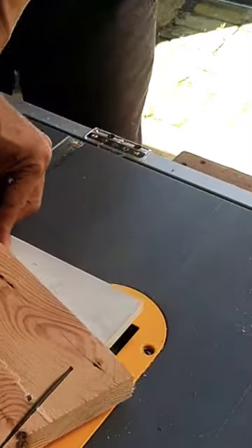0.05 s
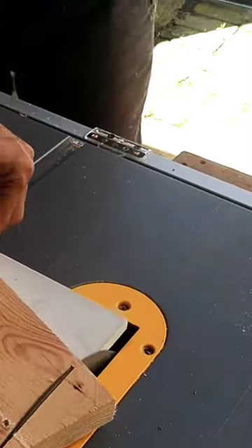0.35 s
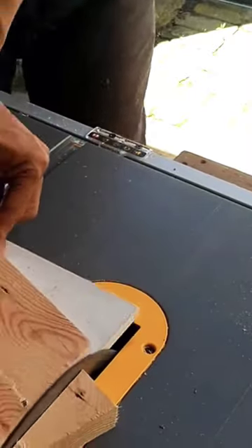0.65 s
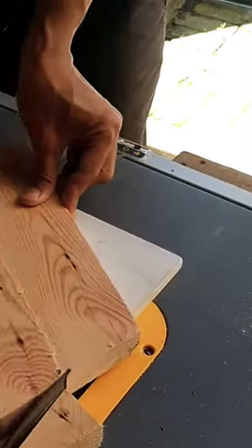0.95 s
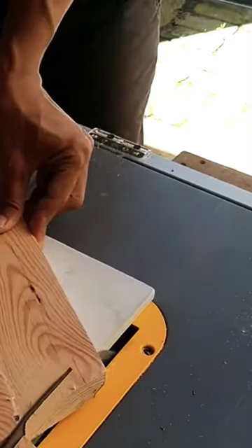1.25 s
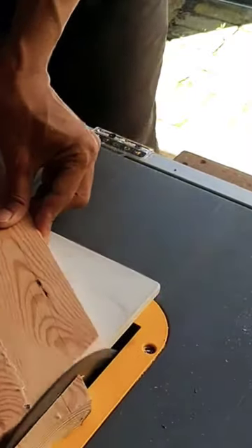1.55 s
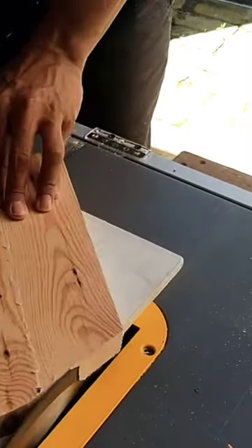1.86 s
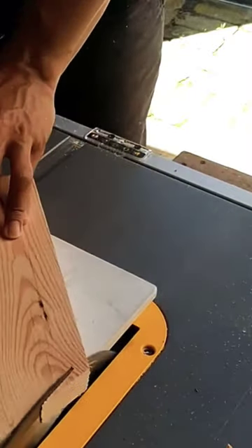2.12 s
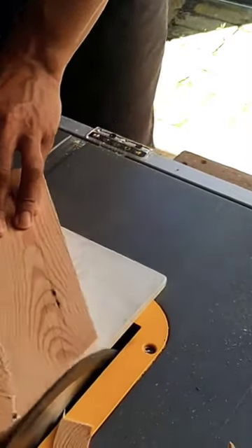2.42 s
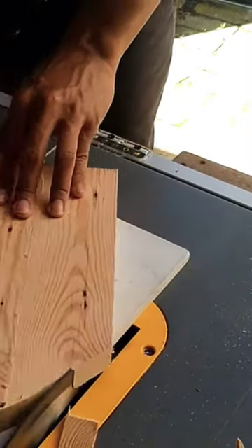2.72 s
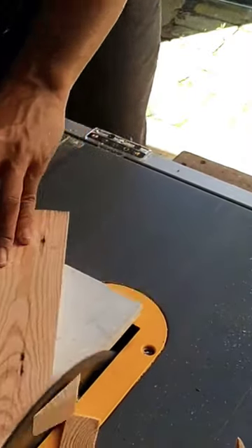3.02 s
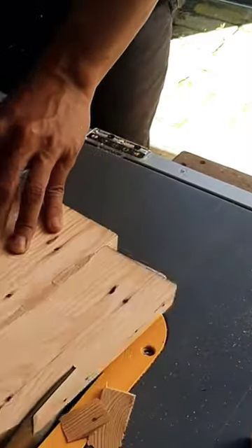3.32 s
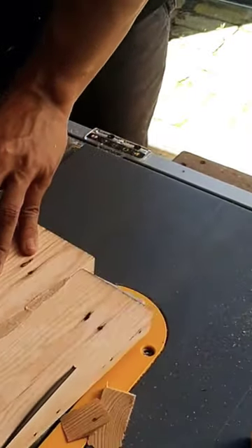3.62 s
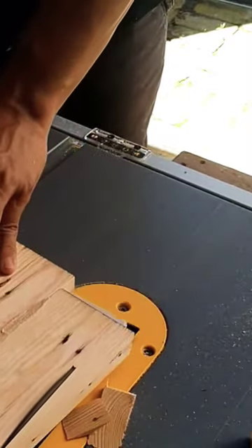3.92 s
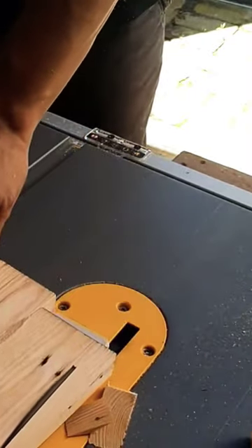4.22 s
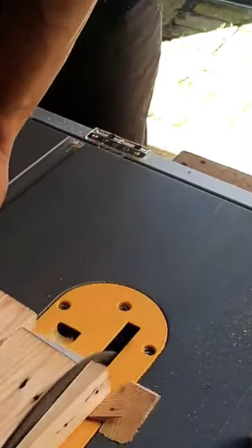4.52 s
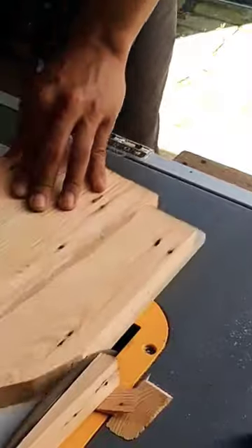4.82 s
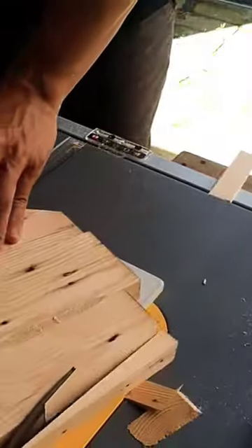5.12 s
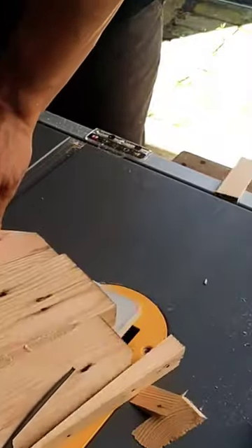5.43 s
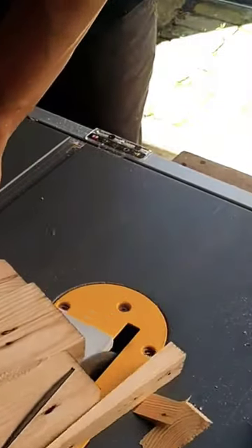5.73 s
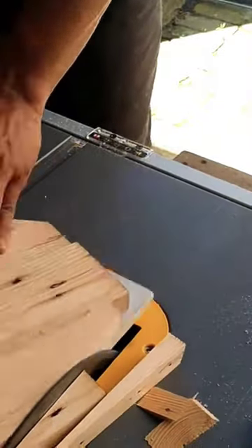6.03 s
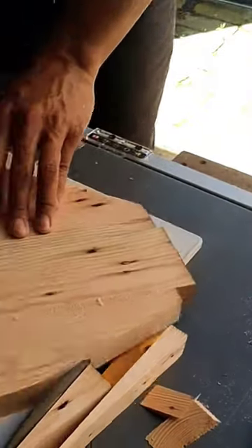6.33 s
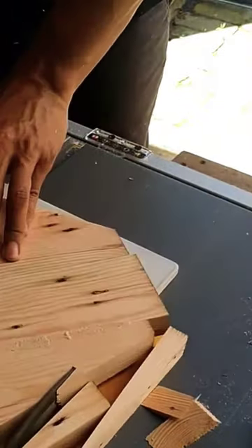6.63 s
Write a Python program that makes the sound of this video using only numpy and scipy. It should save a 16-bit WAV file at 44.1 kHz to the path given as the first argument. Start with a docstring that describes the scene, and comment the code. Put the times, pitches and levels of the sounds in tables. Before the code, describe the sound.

A table saw whines and roars close by, rasping through wood in several quick cuts separated by brief dropouts.

```python
"""At a table saw, microphone close to the blade: a wooden panel rides through on a sled to have its
corners and long edges trimmed. In each cut the motor sags, the teeth rasp, dust hisses and the steel
blade rings; clear of the wood it speeds up and roars. Air from the blade buffets the microphone,
offcuts knock on the table, and the sound catches in brief buzzes and drops out between passes."""
import sys
import numpy as np
from scipy import signal
from scipy.fft import rfft, irfft
from scipy.io import wavfile
from scipy.ndimage import uniform_filter1d

SR = 44100
rng = np.random.default_rng(int(sys.argv[2]) if len(sys.argv) > 2 else 0)


def master_out(mix):
    """Clip the mix to full scale and print it as 16-bit PCM to the path in sys.argv[1]."""
    frames = np.transpose(np.atleast_2d(mix))
    ceiling = np.clip(frames, -1, 1)
    pcm = np.round(ceiling * 32767).astype(np.int16)
    wavfile.write(sys.argv[1], SR, pcm)


N = 298116
T = np.arange(N) / SR
HZ = np.fft.rfftfreq(N, 1 / SR)
LOUD_ROAR_DB = -34  # hum and growl are balanced against a roar this loud
TOP_HZ = 15600

# teeth in the wood: start/s, end/s, ring/dB, kind of cut, rasp/dB, dust/dB
# (kind: 0 corner, 1 first edge, 2 second edge; fractions blend them)
CUTS = [(0, .55, 0.5, 0.63, -48, -55), (1.19, 1.516, -2, 0, -49.5, -44), (2.05, 2.422, 0.5, 0.21, -62, -61),
        (2.828, 3.123, 0, 0, -47.5, -56), (3.38, 4.392, -6.5, 1.5, -75, -47),
        (5.367, 5.81, -0.5, 2.2, -47.5, -45), (6.566, 6.868, -17, 0.059, -54.5, -54)]
# the sound drops out between passes: stop/s, back/s, fall time/s, depth/dB
DROPOUTS = [(.922, .957, .004, 33), (1.762, 1.815, .004, 38), (2.703, 2.738, .016, 29),
            (3.362, 3.415, .003, 39), (4.962, 4.991, .005, 26), (6.362, 6.42, .014, 38)]


def gain_of(db):
    """Decibels to amplitude."""
    return 10 ** (np.asarray(db) / 20)


def unit_rms(x):
    """Scales to rms 1."""
    return x / np.sqrt(np.mean(x ** 2) + 1e-20)


def sum_db(*gains):
    """Level in dB of unrelated sounds heard at once."""
    return 10 * np.log10(sum(gain ** 2 for gain in gains))


def spectrum_db(points):
    """Joins (f/Hz, level/dB) points into a curve over all frequencies."""
    hz, db = np.transpose(points)
    return np.interp(np.log(HZ + 1), np.log(hz + 1), db)


def wander(per_s, count=1024):
    """Random drift of rms 1, up to about per_s changes a second."""
    rolloff = np.sqrt(1 + (HZ[:count // 2 + 1] / per_s) ** 4)
    slow = irfft(rfft(rng.standard_normal(count)) / rolloff)
    return unit_rms(np.interp(T, np.linspace(0, T[-1], count), slow))


def colour(x, db, band_hz):
    """Filters x by a spectrum, leaving rms 1 inside the band."""
    shaped = rfft(x) * gain_of(db)
    inside = (HZ > band_hz[0]) & (HZ < band_hz[1])
    return irfft(shaped, N) * N / np.sqrt(2 * np.sum(abs(shaped[inside]) ** 2))


def gate(t, start, end, ease_s=0.07):
    """Eases in and out of a span of time."""
    return np.clip(np.minimum(t - start, end - t) / ease_s, 0, 1)


def in_wood():
    """1 while the teeth cut, 0 while they are clear."""
    return sum(gate(T, start, end) for start, end, *_ in CUTS)


def motor_speed():
    """Turns a second of the blade: the motor sags in each cut and recovers."""
    # shaft speed: t/s, rate/Hz
    speed = [(0, 65.7), (.14, 65.5), (.3, 67.7), (.45, 69.5), (.62, 70.6), (.93, 72.4), (.945, 69.7),
             (1.17, 66.6), (1.3, 64.7), (1.47, 64.7), (1.63, 69.2), (1.78, 71.2), (1.8, 71), (1.97, 69.7),
             (2.1, 67.6), (2.25, 66.3), (2.4, 68), (2.55, 70.3), (2.715, 71.3), (2.73, 71), (2.86, 67.8),
             (3.02, 65.4), (3.12, 66.4), (3.25, 69.2), (3.38, 70.7), (3.395, 64.1), (3.6, 62.7),
             (3.8, 62.3), (4.02, 62.9), (4.25, 64), (4.47, 67.3), (4.78, 70.3), (4.972, 71.2),
             (4.982, 67.6), (5.2, 64.5), (5.4, 62.8), (5.63, 62.8), (5.8, 64.6), (6, 68.8), (6.15, 70.6),
             (6.385, 71.7), (6.4, 72.8), (6.55, 69.4), (6.65, 67), (6.76, 65.3)]
    return np.interp(T, *np.transpose(speed)) * (1 + 0.00072 * wander(21.5))


def sled_levels(idle_db=-45.5, fresh_db=-42.5, settle_s=0.35):
    """Whine, roar, rasp and dust in dB: cuts arch the rasp and throw dust; the roar swells and holds."""
    # sled passes: whine/dB, roar start/s, swell/s, full roar/dB, steady rasp/dB, steady dust/dB
    passes = [(-2.5, 0.025, 0.63, -36, -46.5, -43.5), (0, 1.113, .42, -36, -48, -43.5),
              (-5, 1.954, 0.46, -35.5, -46, -43.5), (-4, 2.93, 0.27, -34.5, -44, -42.5),
              (-1, 4.556, 0.23, -33.5, -56.5, -48.5), (-2.5, 5.81, 0.11, -34.5, -50, -43),
              (-1.5, 7.34, .3, -33, -47.5, -40.5)]
    changes = [(stop + back) / 2 for stop, back, _, _ in DROPOUTS]
    under_way = np.array(passes)[np.searchsorted(changes, T)]
    whine_db, roar_s, swell_s, full_db, steady_rasp_db, steady_dust_db = under_way.T
    swell = gain_of(full_db) * np.clip((T - roar_s) / swell_s, 0, 1)
    load = sum(gain_of(db) * np.sin(np.pi * np.clip((T - start) / (end - start), 0, 1))
               for start, end, _, _, db, _ in CUTS)
    thrown = sum(gain_of(db) * gate(T, start, end) for start, end, *_, db in CUTS)
    # after each dropout the hiss comes back brighter, then settles
    fresh = sum(gain_of(fresh_db) * (T > stop) * np.exp(-abs(T - back) / settle_s)
                for stop, back, _, _ in DROPOUTS)
    roar_db = sum_db(gain_of(idle_db), swell, load * gain_of(4))
    rasp_db = sum_db(gain_of(steady_rasp_db), load, swell * gain_of(-6.5))
    dust_db = sum_db(gain_of(steady_dust_db), thrown, fresh, swell * gain_of(-9.5))
    return whine_db, roar_db, rasp_db, dust_db


def housing_db(hz):
    """The saw's housing lifts some frequencies and swallows others."""
    # resonances: f/Hz, width/Hz, gain/dB
    resonances = [(138.1, 5, 11.5), (214.9, 11, 14), (337.4, 46, 6), (417, 21, 14), (560, 144, 10.5),
                  (972, 37, 7), (1071, 69, 11.5), (1393, 40, 7), (2206, 82, 1.5), (2950, 88, -7),
                  (3220, 37, -5), (4740, 30, 10)]
    return sum(db / (1 + (2 * (hz - centre) / width) ** 2) for centre, width, db in resonances)


def reflections(step_hz=30):
    """Close reflections comb a spectrum into deep valleys and blunt peaks."""
    heights = rng.standard_normal(4096)
    return np.minimum(unit_rms(np.interp(HZ / step_hz, np.arange(len(heights)), heights)), 1)


def growl(turns, roar_db):
    """The blade's upper overtones stand out of the air as the roar grows."""
    overtones = sum(np.sin(2 * np.pi * (k * turns + rng.random()) + 0.95 * wander(12))
                    for k in range(7, 23))
    return overtones * gain_of(-20 + 0.39 * (roar_db - LOUD_ROAR_DB))


def roar(turns, level_db, comb_db=5.5):
    """Air torn by the teeth growls and resounds in the housing; its colour shifts as the panel moves."""
    # torn air: f/Hz, level/dB
    spectrum = [(60, -33), (130, -18), (260, -12.5), (340, -4.5), (480, -10.5), (700, -3.5), (900, -1.5),
                (1100, -3.5), (1700, -4.5), (2300, -0.5), (2950, 3.5), (3600, 0.5), (4200, -4.5),
                (4550, -12.5), (6000, -12.5), (9000, -28)]
    air = rng.standard_normal(N) + growl(turns, level_db)
    shape_db = spectrum_db(spectrum) + 0.5 * housing_db(HZ)
    one, other = (colour(air, shape_db + comb_db * reflections(), (400, 2400)) for _ in range(2))
    shift = (1 + np.tanh(2 * wander(3.1))) / 2
    return (shift * one + (1 - shift) * other) * gain_of(level_db + 0.12)


def chips(per_s, spread_db):
    """Sparse clicks, most small and a few large."""
    size = gain_of(spread_db * np.minimum(rng.exponential(1, N), 4))
    return unit_rms(size * rng.standard_normal(N) * (rng.random(N) < per_s / SR))


def glinting(hiss, streak_db=3.2, lasting_db=2):
    """The blade's crowded high modes pick narrow streaks out of a hiss, some brief, some lasting."""
    frames = signal.stft(hiss, nperseg=1024, noverlap=768)[2]
    streaks = uniform_filter1d(rng.standard_normal(frames.shape), size=9, axis=1)
    streaks = unit_rms(uniform_filter1d(streaks, size=2, axis=0))
    lasting = unit_rms(uniform_filter1d(rng.standard_normal(len(frames)), size=2))[:, None]
    frames *= gain_of(streak_db * np.minimum(streaks, 2) + lasting_db * np.minimum(lasting, 2))
    return signal.istft(frames, nperseg=1024, noverlap=768)[1][:N]


def rasp(turns, level_db):
    """Teeth scrape and snap wood fibres, throbbing faintly with each turn."""
    # scraping: f/Hz, level/dB
    spectrum = [(2000, -6.5), (4500, -1), (5500, 1), (6700, -0.5), (7600, 3.5), (8300, 6.5), (9000, -0.5),
                (10500, -8), (14000, -31)]
    fibres = rng.standard_normal(N) + 0.33 * chips(per_s=2800, spread_db=1)
    fibres *= 1 + 0.017 * np.cos(2 * np.pi * turns)
    return colour(glinting(fibres), spectrum_db(spectrum), (6300, 8800)) * gain_of(level_db - 2)


def dust(level_db):
    """A fine spray of sawdust hisses."""
    # spray: f/Hz, level/dB
    spectrum = [(1500, -3), (2700, -5), (4500, -38), (8000, -6), (10000, -4), (12000, 1), (13700, 1),
                (15400, 4.5)]
    spray = rng.standard_normal(N) + 0.77 * chips(per_s=3000, spread_db=3.1)
    return colour(glinting(spray), spectrum_db(spectrum), (11500, 15500)) * gain_of(level_db - 0.5)


def ringing(hz, width_hz, count=16384):
    """A mode kept ringing by random blows, at rms 1; rubbing in the kerf limits its swing."""
    t = np.linspace(0, T[-1], count)
    blows = rng.standard_normal(count) + 1j * rng.standard_normal(count)
    swing = np.fft.ifft(blows / (1 + (np.fft.fftfreq(count, t[1]) / width_hz) ** 2))
    limited = np.interp(T, t, swing / abs(swing) ** 0.4)
    return unit_rms((limited * np.exp(2j * np.pi * hz * T)).real)


def blade_ring(tilt_db_per_octave=0.85):
    """While the teeth bite, their blows keep the steel's modes ringing, each wavering on its own."""
    # blade modes: f/Hz, then relative level/dB in a corner cut, on the first edge, on the second edge
    modes = [(2497, -58, -57, -54), (2670, -57, -61, -56), (2880, -54, -62, -63), (3285, -55, -56, -53),
             (3375, -63, -62, -58), (3808, -48, -56, -56), (4030, -58, -62, -62), (4368, -52, -62, -56),
             (4895, -61, -62, -57), (4969, -53, -59, -67), (5060, -57, -60, -61), (5278, -53, -61, -56),
             (5313, -48, -65, -62), (5508, -59, -67, -53), (5932, -57, -65, -68), (6130, -74, -63, -59),
             (6228, -59, -69, -66), (7004, -64, -74, -68), (7994, -52, -71, -62), (8328, -61, -74, -63),
             (8759, -74, -74, -58), (8995, -59, -71, -65), (9170, -62, -74, -61), (9227, -74, -60, -59),
             (9302, -62, -74, -70), (9512, -74, -74, -60), (9780, -66, -60, -61), (10594, -61, -70, -66),
             (10788, -62, -66, -65), (11110, -59, -61, -61), (11445, -62, -66, -60), (12215, -65, -66, -58),
             (12430, -62, -72, -62), (13500, -58, -68, -62), (13706, -61, -58, -52), (13927, -61, -70, -64),
             (14126, -67, -60, -56), (15342, -59, -60, -52)]
    out, t = np.zeros(N), np.linspace(0, T[-1], 2048)
    for hz, *levels_db in modes:
        drive = sum(gain_of(ring_db + np.interp(kind, (0, 1, 2), levels_db)) * gate(t, start, end)
                    for start, end, ring_db, kind, *_ in CUTS)
        tilt = gain_of(tilt_db_per_octave * np.log2(hz / modes[0][0]))
        out += ringing(hz, width_hz=10) * np.interp(T, t, drive) * tilt
    return out * gain_of(3.5)


def free_ring(rasp_db):
    """A few blade modes ring on between cuts too, following the strength of the rasp."""
    # lingering modes: f/Hz, width/Hz, relative level/dB
    modes = [(2880, 30, -6), (3808, 14, -10), (4368, 14, -13)]
    return sum(ringing(hz, width) * gain_of(db) for hz, width, db in modes) * gain_of(rasp_db + 1)


def shimmer(level_db, per_s=130, band_hz=(5500, 15300), length_s=(0.04, 0.18)):
    """A crowd of weak high blade modes flares up and dies away while the teeth bite."""
    out = np.zeros(N)
    for when, pitch, span, size in rng.random((round(per_s * T[-1]), 4)):
        start = int(when * N)
        t = T[start:start + int(np.interp(span, (0, 1), length_s) * SR)]
        tone = np.sin(2 * np.pi * np.interp(pitch, (0, 1), band_hz) * t) * np.hanning(len(t))
        out[start:start + len(t)] += tone * gain_of(7 * size - 8.75)
    return out * in_wood() * gain_of(level_db - 1)


def blade_resonance(hz, centre_hz=5460, half_width_hz=110):
    """Gain of a tone: it swells as it glides through a resonance of the blade."""
    return gain_of(-2.5 + 6 / (1 + ((hz - centre_hz) / half_width_hz) ** 2))


def whine(turns, turn_hz, whine_db, roar_db, free_turn_hz=70.5, free_roar_db=-37.3):
    """Motor and teeth sing under load; most tones fall back as the blade runs free."""
    # tones: cycles a turn, level/dB, change clear of the wood/dB, change at free speed or full roar/dB
    tones = [(59, -50, -1, -12), (80, -51, -3, -11), (120, -64, 3, 9), (160, -55, 0, -3)]
    out = np.zeros(N)
    clear = 1 - in_wood()
    free = (1 + np.tanh(np.maximum(turn_hz - free_turn_hz, roar_db - free_roar_db))) / 2
    for k, db, clear_db, free_db in tones:
        tone = np.sin(2 * np.pi * k * turns + 0.5 * wander(25)) * blade_resonance(k * turn_hz)
        waver_db = 4.5 * np.minimum(wander(17), 1)
        out += tone * gain_of(db + clear * clear_db + free * free_db + waver_db)
    return np.sqrt(2) * out * gain_of(whine_db)


def hum(turns, turn_hz, roar_db):
    """Each overtone of the turning blade swells as it climbs into a resonance of the housing."""
    # overtones: cycles a turn, relative level/dB, extra dB per dB of roar above LOUD_ROAR_DB
    overtones = [(1, -22.5, -0.1), (2, -28, 0.5), (3, -23, 1), (4, -32, 8), (5, -18, 0.1), (6, -24, 1.5),
                 (8, -34, 0.6)]
    out = np.zeros(N)
    for k, db, growth in overtones:
        level_db = db + growth * (roar_db - LOUD_ROAR_DB) + housing_db(k * turn_hz) + 2.6 * wander(7.2)
        out += gain_of(level_db) * np.sin(2 * np.pi * k * turns + 0.42 * wander(12))
    return np.sqrt(2) * out * gain_of(roar_db)


def squeals():
    """Brief high squeals and narrow bursts of hiss sound out for a moment."""
    # squeals (narrow) and hisses (wider): start/s, end/s, f/Hz, width/Hz, relative level/dB
    bursts = [(.06, .22, 9184, 10, -48), (.35, .5, 5530, 14, -48), (.68, .88, 4290, 14, -48),
              (1.24, 1.48, 3806, 10, -43), (1.14, 1.36, 9005, 10, -53), (1.92, 2.27, 8995, 10, -51),
              (1.95, 2.13, 13700, 300, -43), (2.04, 2.43, 7994, 10, -50), (2.73, 2.99, 8995, 10, -50),
              (2.73, 2.89, 5510, 14, -51), (2.86, 3.05, 13480, 170, -42), (3.42, 3.98, 10788, 10, -53),
              (4.38, 4.53, 5380, 12, -47), (4.99, 5.14, 11420, 10, -48), (4.99, 5.13, 13400, 260, -43),
              (5.46, 5.74, 14700, 600, -42), (6.2, 6.29, 14000, 260, -40), (6.56, 6.8, 8000, 14, -44),
              (6.66, 6.8, 13300, 180, -41)]
    return sum(ringing(hz, width) * gate(T, start, end) * gain_of(db + 1.5)
               for start, end, hz, width, db in bursts)


def gritty_bursts(attack_s=0.014, fade_db=-6, release_s=0.15):
    """Abrupt bursts of hard, gritty rasp that then ease, mostly as the roar swells."""
    # bursts: t/s, length/s, level/dB
    bursts = [(0.363, 0.13, -34), (0.582, 0.13, -30.5), (1.433, 0.59, -38.5), (1.645, 0.084, -37),
              (2.397, 0.22, -34.5), (2.672, .07, -26.5), (3.052, 0.15, -31), (3.222, 0.24, -37),
              (4.618, 0.12, -34), (5.874, 0.32, -34)]
    # hard rasp: f/Hz, level/dB
    spectrum = [(200, -30), (600, -7.5), (1000, 1), (1700, -10.5), (2500, 1.5), (3500, 1), (4200, -3),
                (5200, -24), (9000, -42)]
    grit = rng.standard_normal(N) + 0.35 * chips(per_s=1500, spread_db=2.2)
    envelope = np.zeros(N)
    for s, length, db in bursts:
        ramps = np.clip(np.minimum((T - s) / attack_s, (s + length - T) / release_s), 0, 1)
        envelope += ramps * gain_of(db + fade_db * np.clip((T - s) / length, 0, 1))
    return colour(grit, spectrum_db(spectrum), (500, 5000)) * envelope


def dips_db():
    """The rush of air and wood dips briefly."""
    # dips: t/s, depth/dB, half width/s
    dips = [(0.534, 7, 0.034), (1.927, 12, 0.011), (2.031, 17.5, 0.0094), (2.642, 8.5, 0.02),
            (3.16, 7.5, 0.016), (4.075, 5, 0.036), (5.72, 17, 0.013), (6.12, 6, 0.02), (6.25, 8.5, 0.019)]
    return sum(depth * np.exp(-((T - s) / width) ** 2) for s, depth, width in dips)


def stutter(x, bands=20, linger_s=0.009, hush_db_per_s=1000):
    """The sound catches: its noise gives way to two ringing notes and a buzz of its strongest tones."""
    # catches: t/s, half width/s, first note f/Hz, second note f/Hz, level/dB
    catches = [(.536, .008, 2697, 856, -46), (.982, .009, 3032, 2526, -48), (1.164, .018, 3603, 329, -48),
               (1.666, .008, 1137, 876, -37), (1.923, .008, 2715, 3849, -48),
               (1.965, .008, 2876, 2699, -48), (2.027, .009, 3814, 8925, -51),
               (2.692, .01, 1126, 1003, -38), (2.753, .01, 1045, 2875, -46), (3.265, .007, 2968, 1412, -39),
               (4.078, .009, 3109, 2397, -50), (4.503, .011, 2678, 3055, -52),
               (4.815, .017, 1089, 1437, -38), (4.867, .007, 2881, 1383, -39),
               (5.016, .01, 2884, 1961, -49), (5.079, .011, 2699, 3900, -48), (5.4, .008, 2694, 4896, -49),
               (5.464, .008, 5272, 2886, -47), (5.612, .009, 998, 2511, -48),
               (5.721, .009, 2646, 3506, -48), (5.786, .009, 1093, 2961, -45),
               (6.082, .009, 3284, 1400, -40), (6.253, .01, 2861, 1038, -43), (6.35, .016, 2849, 2464, -42),
               (6.552, .01, 2701, 1465, -47)]
    edges_hz = np.linspace(0, 1, bands + 1) ** 1.3 * (TOP_HZ - 250) + 250
    out = x.copy()
    for s, width, first_hz, second_hz, db in catches:
        near = abs(T - s) < 2 * (width + linger_s)
        t = T[near] - s
        hz, density = signal.periodogram(x[near], SR, "hann", nfft=8192)
        tones = [(first_hz, gain_of(db)), (second_hz, gain_of(db - 0.5))]
        for low, high in zip(edges_hz, edges_hz[1:]):
            band = density * ((hz >= low) & (hz < high))
            band_rms = np.sqrt(hz[1] * band.sum())
            tones.append((hz[band.argmax()], band_rms * gain_of(-0.5) * np.sqrt(rng.random())))
        buzz = np.sqrt(2) * sum(size * np.sin(2 * np.pi * (f * t + rng.random())) for f, size in tones)
        out[near] *= gain_of(-hush_db_per_s * width * np.exp(-(t / width) ** 4))  # longer is deeper
        out[near] += buzz * np.exp(-(t / (width + linger_s)) ** 4)
    return out


def buffeting(still_db=-108):
    """The blade's draught rumbles on the near microphone in lumps; gusts land as single slow pushes."""
    # wind on the microphone: f/Hz, level/dB
    spectrum = [(8, -3), (22, 6), (45, -5.5), (90, -12.5), (200, -13), (500, -18.5)]
    # spells of draught: start/s, end/s, relative level/dB
    spells = [(3.32, 4.66, -41.5), (4.915, 5.413, -42.5), (5.485, 5.768, -42), (6.387, 6.784, -53)]
    # gusts: t/s, peak/dB, half width/s
    gusts = [(1.922, -36, 0.006), (2.031, -37, 0.0036), (2.795, -36, 0.0061), (3.8, -38, 0.0018),
             (4.407, -36, 0.011), (4.5, -32.5, 0.0067), (5.1, -30.5, 0.005), (5.187, -28, 0.0037),
             (5.236, -30, .007), (5.574, -28, 0.0077), (6.424, -35, 0.0027)]
    shape_db = spectrum_db(spectrum) - 60 * (HZ > spectrum[-1][0])
    air = colour(rng.standard_normal(N), shape_db, (15, 55))
    lumps = unit_rms(gain_of(4 * wander(14)))
    draught = sum(gain_of(db) * gate(T, start, end, ease_s=0.099) for start, end, db in spells)
    out = air * lumps * (gain_of(still_db) + draught) * gain_of(-5)
    for s, db, width in gusts:
        u = (T - s) / width
        out -= gain_of(db) * (1 - u ** 2 / 2) * np.exp(-u ** 2 / 2)
    return out


def knocks():
    """Loose offcuts thud on the table top."""
    # blows: t/s, level/dB
    hits = [(2.922, -59), (4.536, -54), (4.557, -54), (4.571, -50), (4.584, -49), (5.183, -52)]
    # table modes: f/Hz, gain/dB, t60/s
    modes = [(84.96, -27, .07), (152, 15.5, 0.054), (268, 12, 0.059), (583, 6, 0.15)]
    t, blows = np.arange(SR // 4) / SR, np.zeros(N)
    for s, db in hits:
        blows[round(s * SR)] = gain_of(db)
    ring = sum(gain_of(db - 60 * t / t60) * np.sin(2 * np.pi * hz * t) for hz, db, t60 in modes)
    return signal.oaconvolve(blows, ring)[:N]


def scene(waver_db=1.46):
    """The saw from close by, alike in both channels; one shaft drives whine, hum and growl."""
    turn_hz = motor_speed()
    turns = np.cumsum(turn_hz) / SR
    whine_db, roar_db, rasp_db, dust_db = sled_levels()
    dip_db = dips_db()
    rush = (roar(turns, roar_db) + rasp(turns, rasp_db) + gritty_bursts()) * gain_of(-dip_db)
    rush += dust(dust_db - 0.37 * dip_db)
    ring = blade_ring() + squeals() + free_ring(rasp_db) + shimmer((rasp_db + dust_db) / 2)
    motor = whine(turns, turn_hz, whine_db, roar_db) + hum(turns, turn_hz, roar_db)
    rush *= gain_of(waver_db * wander(6))
    mono = stutter(rush + ring) + motor + buffeting() + knocks()
    return np.array([mono, mono])


def record(dry, rise_s=0.023):
    """The sound cuts out and fades back between passes; the treble ends at TOP_HZ."""
    drop_db = sum(depth * np.clip(np.minimum((T - stop) / fall, (back - T) / rise_s), 0, 1)
                  for stop, back, fall, depth in DROPOUTS)
    low_pass = signal.firwin(511, TOP_HZ, window=("kaiser", 9), fs=SR)
    return signal.oaconvolve(dry * gain_of(-drop_db), low_pass[None], "same")


dry = scene()
out = record(dry)
master_out(out)
```